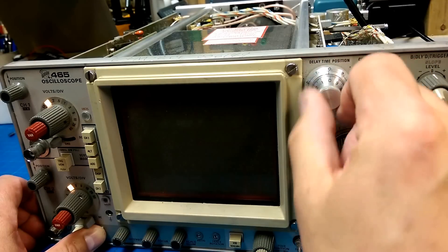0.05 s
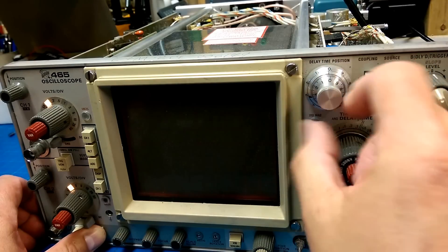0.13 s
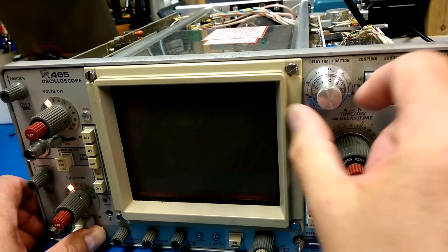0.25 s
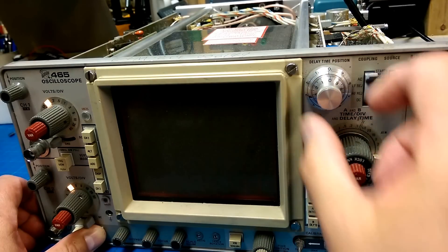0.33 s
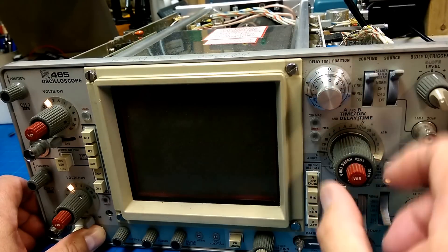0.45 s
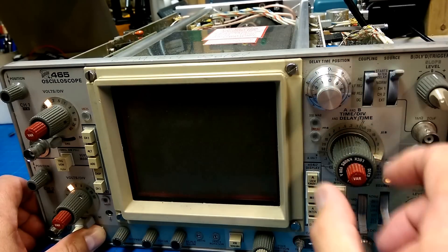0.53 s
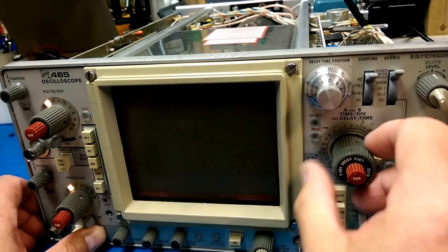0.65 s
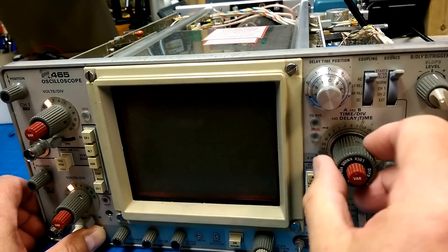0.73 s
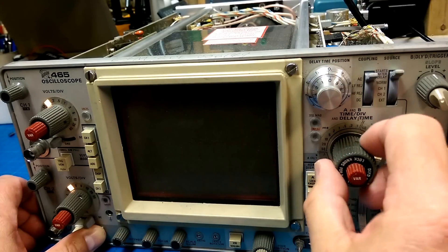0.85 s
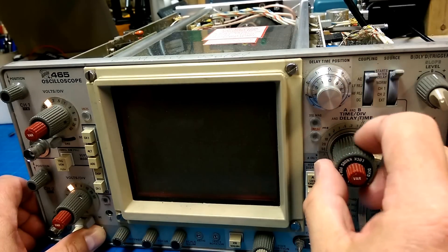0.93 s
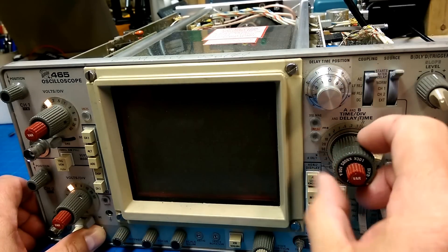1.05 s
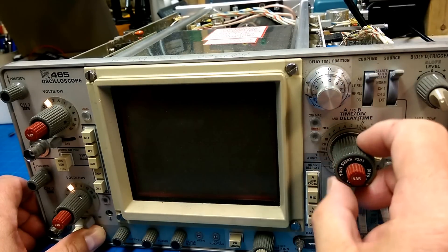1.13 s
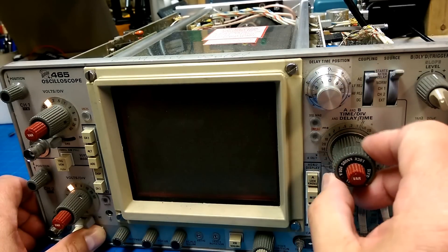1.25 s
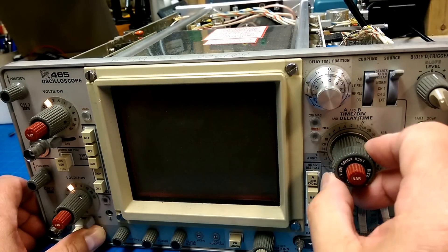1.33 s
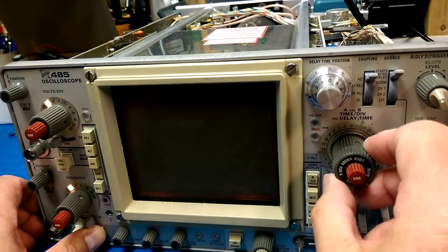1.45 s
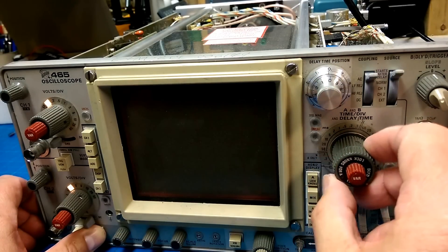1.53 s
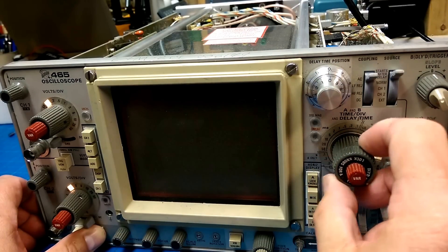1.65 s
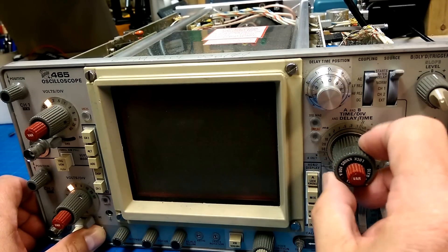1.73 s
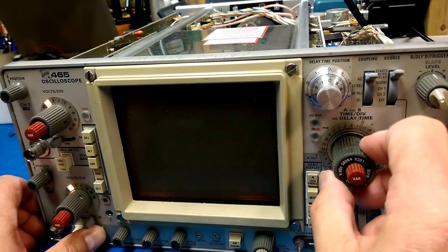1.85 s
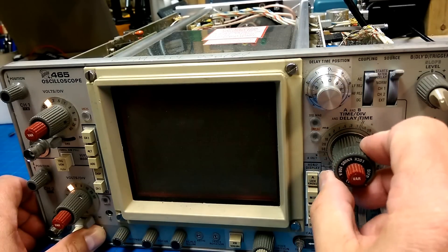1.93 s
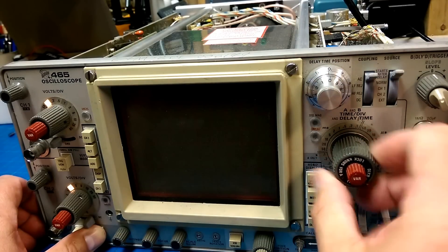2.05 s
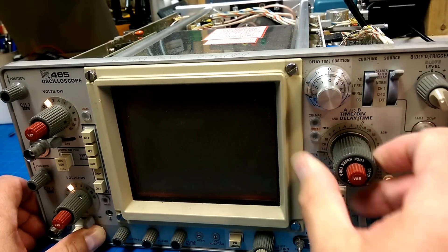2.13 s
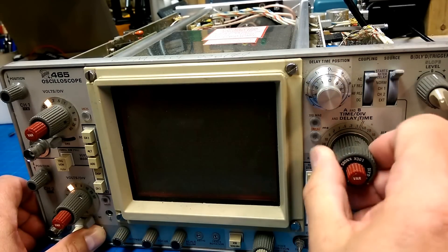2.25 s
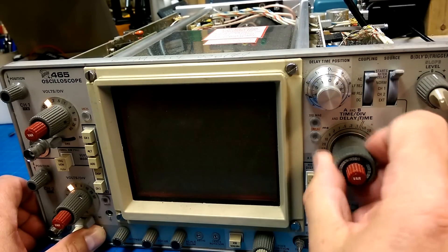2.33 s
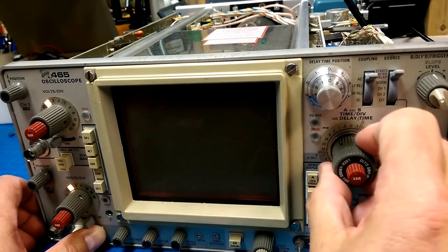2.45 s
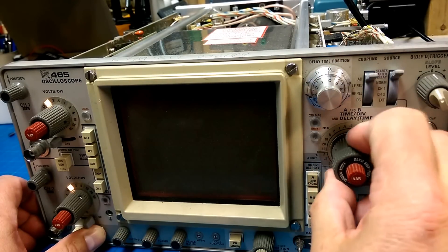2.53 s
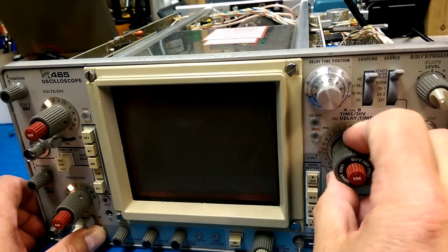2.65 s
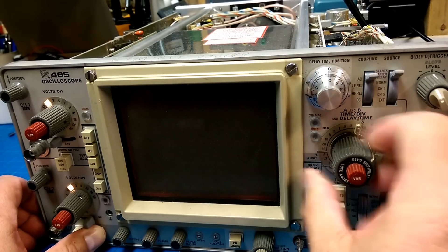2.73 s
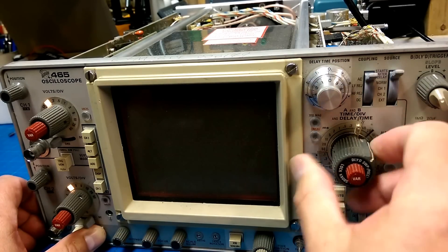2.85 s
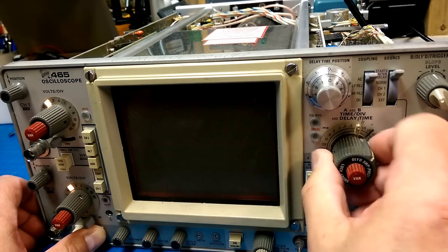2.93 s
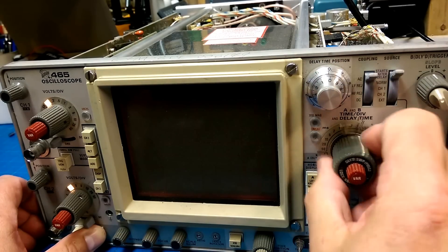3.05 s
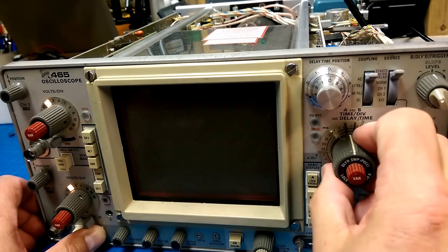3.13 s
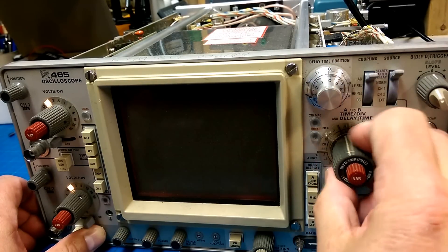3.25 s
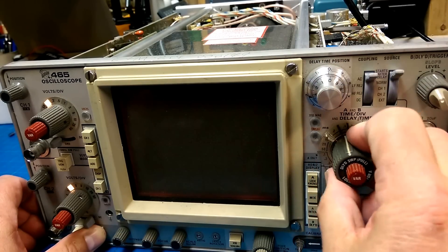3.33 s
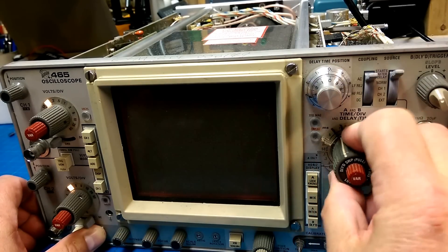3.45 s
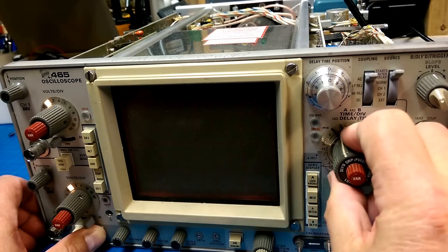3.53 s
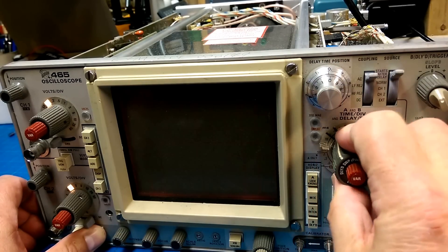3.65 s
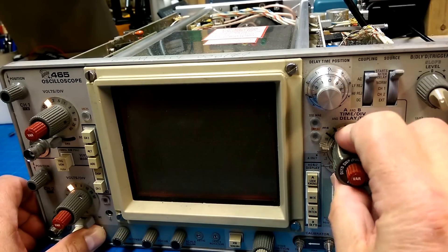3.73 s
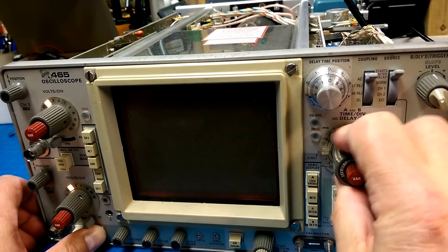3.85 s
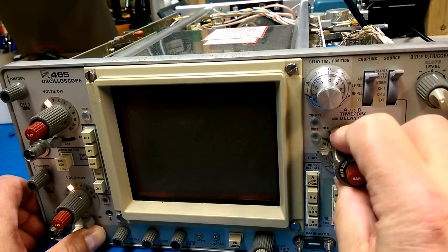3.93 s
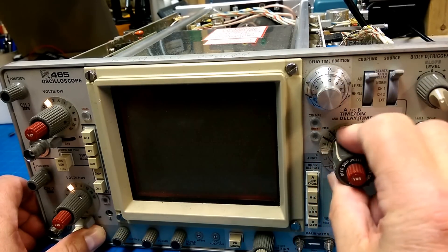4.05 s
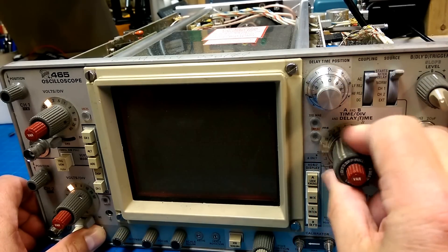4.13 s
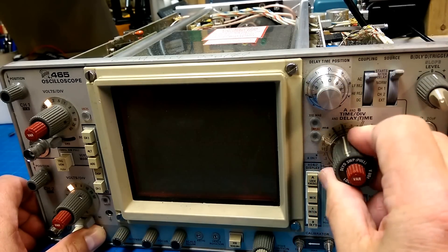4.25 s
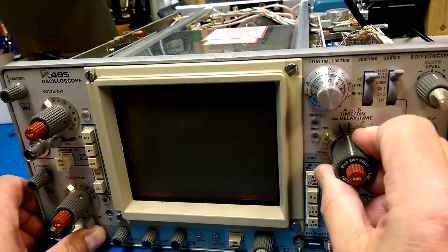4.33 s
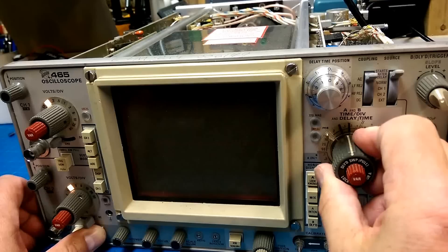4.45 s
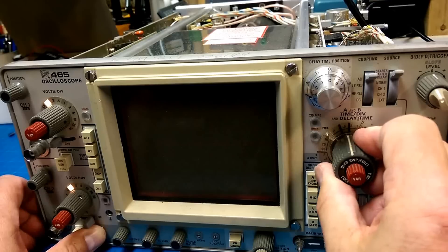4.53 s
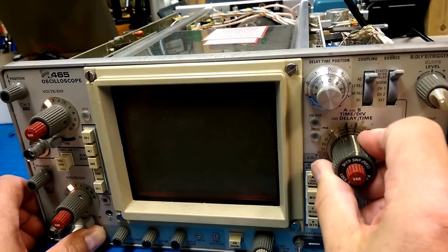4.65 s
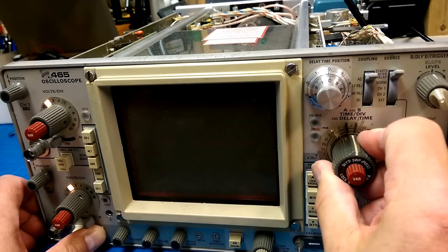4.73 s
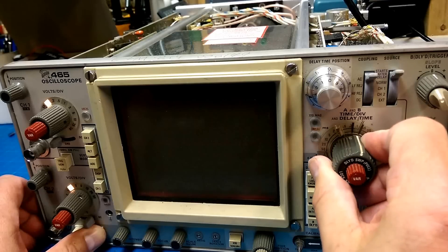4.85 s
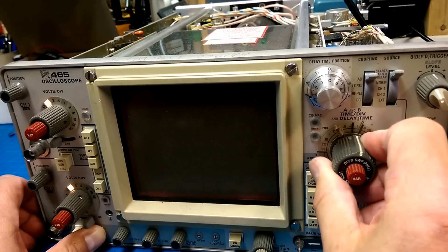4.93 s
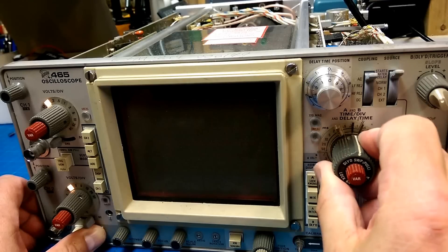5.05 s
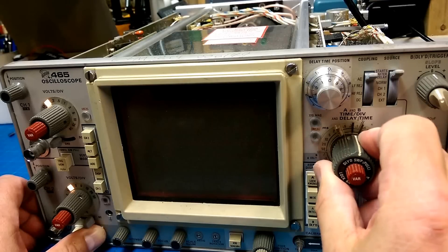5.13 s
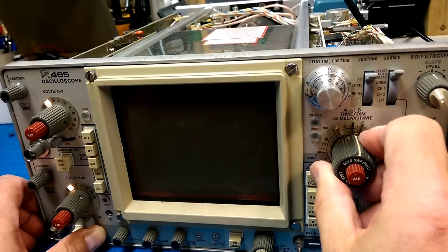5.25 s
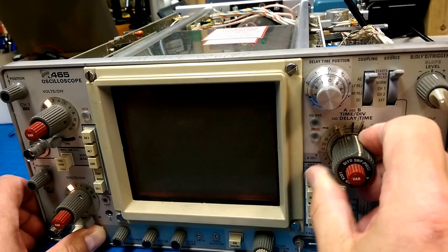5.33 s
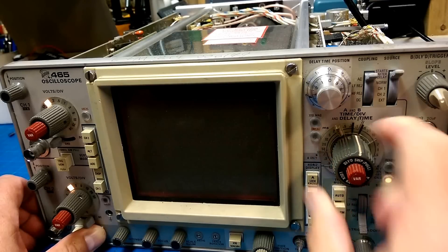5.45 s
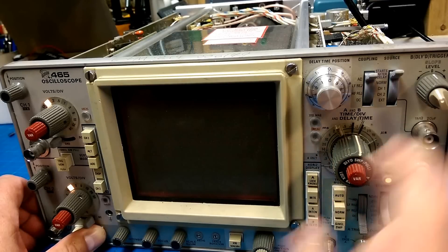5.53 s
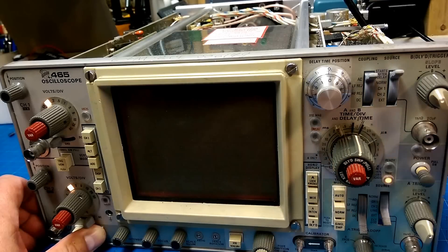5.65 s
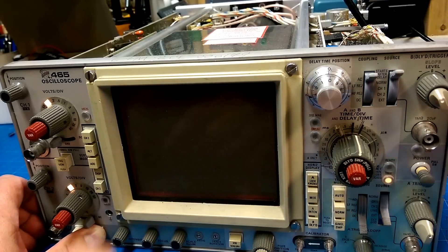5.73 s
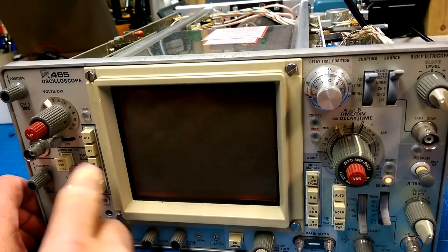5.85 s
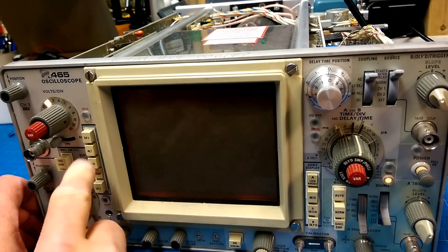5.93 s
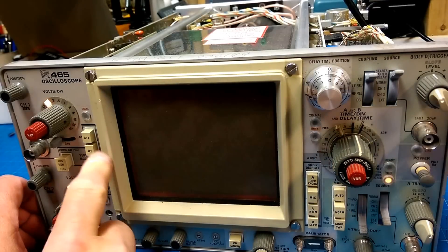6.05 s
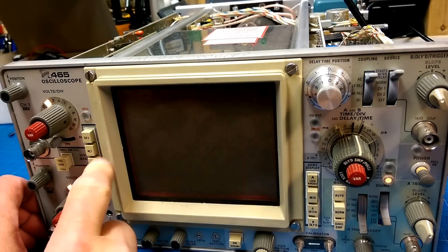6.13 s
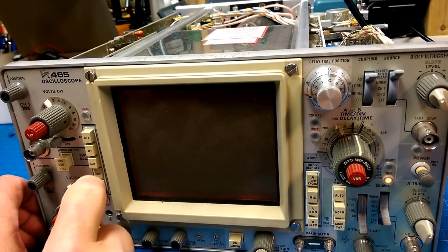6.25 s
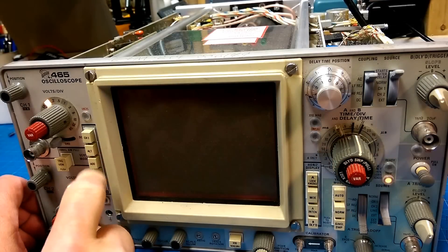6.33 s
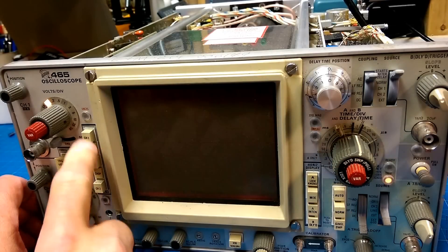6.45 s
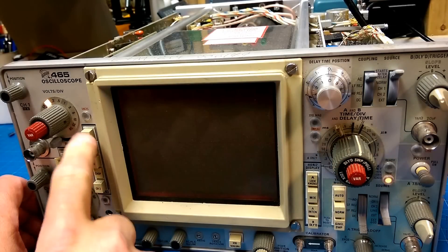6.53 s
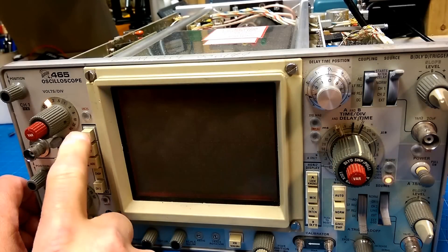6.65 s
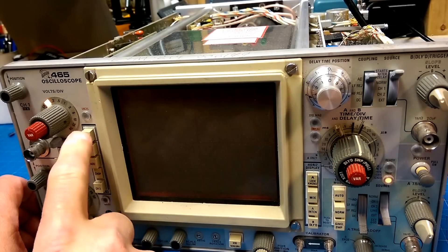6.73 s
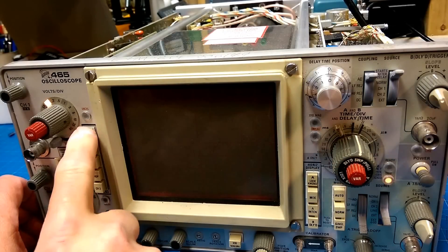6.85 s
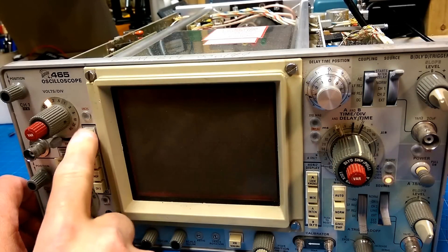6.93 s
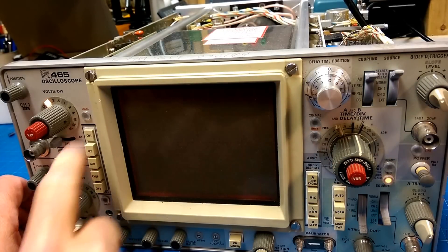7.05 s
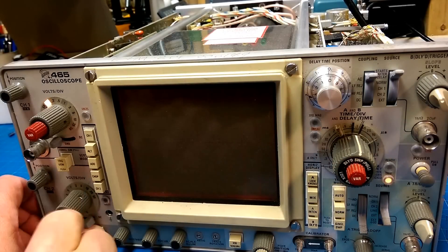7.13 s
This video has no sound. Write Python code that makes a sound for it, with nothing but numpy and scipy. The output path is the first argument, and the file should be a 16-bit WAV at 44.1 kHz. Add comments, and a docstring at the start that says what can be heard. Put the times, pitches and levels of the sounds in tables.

```python
"""Mains hum, room rumble and hiss swell and sink throughout. Fingers first brush and grip the knobs of a
bench instrument, with dull knocks. From 2.4 s its rotary switch clicks through the detents, in quick runs,
then single steps; the springs ring on. At 5.7 s the hand rustles away; at 6.9 s it presses and releases a
push button. Each contact is a chatter of tiny blows that snaps and shoves the sheet-metal case. The left
microphone faces the panel; the right is shadowed and hears mostly case and bench."""
import sys
import numpy as np
from scipy import signal
from scipy.fft import rfft, irfft, next_fast_len
from scipy.io import wavfile
from scipy.ndimage import uniform_filter1d, map_coordinates

SR = 44100
rng = np.random.default_rng(int(sys.argv[2]) if len(sys.argv) > 2 else 0)


def persist_wave(psi):
    """Save psi, clipped to +-1, as 16-bit WAV."""
    counts = np.round(np.clip(psi, -1, 1) * 32767).astype(np.int16)
    wavfile.write(sys.argv[1], SR, np.atleast_2d(counts).T)


N = 317520
SPAN = 1 << 13  # samples per event

# Background swell and hum level. Each row: time in seconds, gain in dB.
SWELL_DB = [(0, 1), (.2, 5.5), (.7, -5), (.8, 3.5), (1, 1), (2, .5), (2.3, 5), (2.9, 4.5), (4.6, 3),
            (5.05, 6), (5.3, -1.5), (5.6, 3.5), (6.2, -1.5), (6.5, -4), (6.65, 1.5), (6.8, 0), (7, 7),
            (7.2, 1)]
HUM_LEVEL_DB = [(0, -64.5), (.6, -68), (3, -64), (4.5, -65), (5.3, -71.5), (6.6, -74), (7.2, -69)]
# Hum partials. Each row: harmonic number, relative level in dB.
HUM_HARMONICS = [(1, 0), (2, -14), (4, -16), (6, -17), (7, -17), (8, -19)]
# Noise and snap spectra. Each row: frequency in Hz, relative density in dB.
RUMBLE_DB = [(8.8, -30), (15, -4), (22, -2.5), (92, -9), (124, -8.5), (160, -17), (210, -38), (350, -120)]
DRONE_DB = [(82, -42.5), (140, -12), (259, -5), (485, -12.5), (521, -15), (567, -10.5), (632, -15),
            (930, -15.5), (1020, -17.5), (2500, -25.5), (3250, -54.5), (5500, -120)]
HISS_DB = [(880, -35), (1500, -9), (1800, -8), (2850, -3), (3850, -5), (13800, -12), (15700, -11),
           (16500, -25)]
SNAP_DB = [(350, -29.5), (600, -10), (872, -8.5), (1420, -4.5), (1580, -8), (2270, -2.5), (3350, -5),
           (4670, -2), (6000, -5.5), (8360, -6.5), (14400, -10.5), (15800, -20.5), (16500, -40.5)]
RUSTLE_DB = [(1500, -25), (2500, -1.5), (5000, -8), (8600, 0), (11000, -3), (16000, -10)]
# Stereo likeness. Each row: frequency in Hz, left-right correlation.
DRONE_CORRELATION = [(60, 0.3), (180, 1), (550, 0.13), (1650, 0.39), (4970, -0.04), (15000, 0.19)]
RUMBLE_CORRELATION = [(30, 0.68), (150, 0.43)]
# Direct path and bench scatter at the right microphone. Each row: frequency in Hz, gain in dB.
SHADOW_DB = [(200, -1), (700, -6.5), (2400, -13), (4400, -35.5), (8000, -32), (15000, -44)]
SCATTER_DB = [(200, 6.5), (1300, 2), (4400, -10.5), (15000, -17)]
# Bench and room decay. Each row: frequency in Hz, T60 in seconds.
BENCH_T60_S = [(300, 0.3), (1000, 0.097), (3000, 0.09), (8000, 0.08), (15000, 0.091)]
ROOM_T60_S = [(200, 0.63), (1000, 0.32), (4000, 0.26), (15000, 0.13)]
# Case and contact spring modes. Each row: frequency in Hz, relative level in dB, T60 in seconds.
CASE_MODES = [(80, -10, 0.11), (157, -7.5, 0.14), (203, -12.5, 0.2), (252.4, -3.5, 0.12), (331, -6, 0.12),
              (411.1, -0.5, 0.15), (440.6, -3.5, 0.2), (500.7, -9.5, 0.16), (617, -4, 0.1), (735, 6, 0.08),
              (843, 7, 0.09), (936, 4.5, 0.14), (1162, -6.5, 0.18), (1493, 5.5, 0.038)]
SPRING_MODES = [(3900, -64.5, .3), (5850, -66.5, .25), (7650, -64.5, .3)]
# Resonances of switch and button parts. Each row: centre in Hz, width in Hz, mean lift in dB.
SWITCH_PARTS = [(2300, 350, 4.5), (3056, 250, 5.5), (4547, 400, 4), (5230, 250, 5), (6860, 140, 8.5),
                (7554, 160, 4), (8310, 460, 6), (9560, 1500, 5), (10740, 630, 3.5)]
BUTTON_PARTS = [(805, 290, 11), (1660, 180, 11), (2475, 280, 14), (4600, 290, 3), (9500, 1240, 14.5),
                (11200, 510, 9)]
# Dull knocks. Each row: start in seconds, strength in dB, pitch in Hz, T60 in seconds.
KNOCKS = [(.054, -42.5, 249, 0.14), (.756, -31, 334, 0.059), (1.084, -27.5, 156, 0.058),
          (1.393, -56, 260, 0.21), (1.523, -47, 258, 0.12), (1.762, -43, 220, .088),
          (1.809, -46.5, 272, 0.12), (4.086, -41.5, 256, 0.097), (5.833, -47, 327, .1),
          (6.643, -52.5, 356, 0.3), (7.087, -51, 211, 0.32)]
# Fingers meeting and leaving the knobs; button press and release. Each row: time in seconds,
# snap in dB, case shove in dB, colour peak in Hz, tilt in dB per octave.
KNOB_TOUCHES = [(0.0247, -28, -67, 2580, -2.5), (.0692, -29, -71, 3900, -6), (0.0732, -28.5, -73, 2130, 7),
                (0.1191, -6, -48, 1150, -1.5), (0.1693, -16.5, -48.5, 2650, -4),
                (0.2595, -23.5, -59, 2720, -3), (0.745, -29.5, -55, 2270, -7), (0.76, -36, -48, 2300, -5),
                (0.8156, -32, -52, 2140, -7), (1.0849, -17, -42, 1870, -2), (1.096, -17, -62, 2420, -3),
                (1.301, -35.5, -61, 4440, -9), (1.5148, -30.5, -59.5, 3000, -10.5),
                (1.821, -37.5, -63, 2280, -9), (1.8688, -31.5, -56.5, 4460, -5.5),
                (2.1186, -21, -44.5, 3240, -7), (2.1468, -28, -48, 2660, -2.5),
                (2.2171, -26, -52.5, 1820, -8), (2.224, -30.5, -58, 8230, -2.5),
                (2.2806, -28.5, -54.5, 4340, -4), (2.3079, -20.5, -53.5, 4120, -2),
                (2.3196, -28, -53.5, 3610, -5), (2.7647, -16, -45.5, 2530, -3),
                (2.9813, -26, -66.5, 2880, -10), (3.0212, -37.5, -54, 2150, -10.5),
                (4.0689, -10.5, -44, 3050, -3.5), (5.0376, -27.5, -52, 2380, -4.5),
                (5.3784, -37.5, -69, 3270, -5), (5.3969, -32, -57.5, 1990, -10),
                (5.453, -33.5, -68, 3200, -3), (5.5127, -19, -46.5, 3800, -4), (6.5987, -28, -58, 2500, -9)]
BUTTON_HITS = [(6.8767, -6.5, -45, 4280, 0.5), (6.8819, 6, -34, 2870, -1), (6.8857, 2, -41, 4480, 1),
               (7.0449, -23, -58, 4750, -6), (7.0486, -19, -58, 2510, -3), (7.0642, -24, -59.5, 1700, -4)]
# Switch detents. Each row: time in seconds, snap in dB, colour peak in Hz, chatter length in seconds.
DETENT_HITS = [(2.4079, 8.5, 2320, 0.0083), (2.424, 8.5, 4600, 0.0077), (2.4379, 12, 4640, .0063),
               (2.4576, 9, 7450, 0.0049), (2.5605, 8.5, 3910, .0038), (2.602, 9.5, 8860, 0.0054),
               (2.6332, 9, 8340, 0.0052), (3.1207, 11, 9600, 0.0043), (3.1372, 10.5, 4700, 0.0036),
               (3.162, 10.5, 4930, 0.0037), (3.184, 8.5, 4420, 0.0052), (3.336, 7.5, 9840, 0.004),
               (3.5239, 9, 9200, 0.0037), (3.7187, 9.5, 5140, .004), (3.9364, 9, 4430, .0042),
               (4.2305, 9, 8070, 0.0047), (4.2553, 4, 4930, 0.0047), (4.417, 6, 5540, 0.0055),
               (4.6798, 8, 7970, 0.0017), (4.9155, 6, 3920, 0.005)]


def amp(db):
    return 10 ** (np.asarray(db) / 20)


def unit_rms(x):
    return x / np.sqrt(np.mean(x ** 2) + 1e-20)


def over_hz(points, hz):
    """Interpolate on a log frequency axis."""
    knots_hz, values = np.transpose(points)
    return np.interp(np.log(hz + 1), np.log(knots_hz + 1), values)


def over_time(points):
    """Interpolate to one value per sample."""
    return np.interp(np.arange(N) / SR, *np.transpose(points))


def wobble(rate_hz):
    """Smooth random curve."""
    knots = rng.standard_normal(int(N * rate_hz / SR) + 4)
    return map_coordinates(knots, [np.arange(N) * rate_hz / SR])


def filtered(x, response):
    """Apply a frequency response."""
    size = next_fast_len(N + SR // 2)
    return irfft(rfft(x, size) * response(np.fft.rfftfreq(size, 1 / SR)), size)[..., :N]


def min_phase(gain_db):
    """Causal response with these gains."""
    cepstrum = irfft(np.log(amp(np.maximum(gain_db, -80))))
    half = cepstrum.shape[-1] // 2
    cepstrum[..., 1:half] *= 2
    cepstrum[..., half + 1:] = 0
    return np.exp(rfft(cepstrum))


def whiten(spectrum):
    """Level out broad chance colour."""
    power = uniform_filter1d(np.abs(spectrum) ** 2, size=60, axis=-1)
    return spectrum * min_phase(-10 * np.log10(power + 1e-6))


def tail(t60_s, size):
    """Unit-energy stereo noise; each frequency decays at its own rate."""
    hz, t, bins = signal.stft(rng.standard_normal((2, size)), SR, nperseg=128)
    decay = amp(-60 * t / over_hz(t60_s, hz)[:, None])
    x = signal.istft(bins * decay, SR, nperseg=128)[1][:, :size]
    return x / np.linalg.norm(x[0])


def noise(spectrum_db, correlation, patchy_db):
    """Unit-rms stereo noise with patches of random gain."""
    bins = signal.stft(rng.standard_normal((2, N)), nperseg=512)[2]
    patches = uniform_filter1d(rng.standard_normal(bins.shape[1:]), size=6, axis=0)
    patches = unit_rms(uniform_filter1d(patches, size=10, axis=1))
    pair = signal.istft(bins * amp(patchy_db * patches), nperseg=512)[1][:, :N]

    def response(hz):
        angle = np.arccos(np.clip(over_hz(correlation, hz), -1, 1)) / 2
        return amp(over_hz(spectrum_db, hz)) * [np.cos(angle), np.sin(angle)]

    mid, side = filtered(pair, response)
    return unit_rms(np.array([mid + side, mid - side]))


def transformer_hum(hum_hz=118.6):
    """Mains harmonics, wavering in pitch and level."""
    phase = 2 * np.pi * np.cumsum(hum_hz + .5 * wobble(3.1)) / SR
    tone = sum(amp(db + 1.2 * wobble(4.5)) * np.sin(k * phase) for k, db in HUM_HARMONICS)
    return amp(over_time(HUM_LEVEL_DB)) * tone


def room_noise():
    """Rumble, drone and hiss on one swell; the drone moves most, the rumble least."""
    swell_db = over_time(SWELL_DB)
    rumble = amp(-68.5 + 0.67 * swell_db) * noise(RUMBLE_DB, RUMBLE_CORRELATION, patchy_db=1.3)
    drone_gain = amp(-69 + 1.3 * swell_db + 0.65 * wobble(7.5))
    drone = drone_gain * noise(DRONE_DB, DRONE_CORRELATION, patchy_db=3.0)
    hiss = amp(-72.5 + 0.78 * swell_db) * noise(HISS_DB, [(1000, 0.0097)], patchy_db=2.35)
    return (rumble + drone) * amp([[1.1], [-1.1]]) + hiss


def hand_rustle(start_s=5.69, rise_s=0.045, hold_s=.05, fall_db_per_s=110):
    """The hand moves away: a faint swish, left of centre."""
    age_s = np.arange(N) / SR - start_s
    fade_db = fall_db_per_s * (age_s - rise_s - hold_s).clip(0)
    gain = np.clip(age_s / rise_s, 0, 1) * amp(-70 - fade_db)
    return gain * noise(RUSTLE_DB, [(1000, 0)], patchy_db=2) * amp([[3], [-5]])


def knocks(rise_s=0.028):
    """Short low tones with a soft start."""
    out, t = np.zeros(N + SPAN), np.arange(SPAN) / SR
    for start_s, db, hz, t60_s in KNOCKS:
        envelope = amp(db - 60 * t / t60_s) * (1 - np.exp(-t / rise_s))
        out[round(start_s * SR):][:SPAN] += envelope * np.sin(2 * np.pi * hz * t)
    return out[:N]


def springs():
    """Thin switch springs ring on after each detent, mostly on the left."""
    out, t = np.zeros(N + SPAN), np.arange(SPAN) / SR
    for start_s, snap_db, *_ in DETENT_HITS:
        ring = np.zeros(SPAN)
        for hz, db, t60_s in SPRING_MODES:
            envelope = amp(db + rng.normal(0, 3) - 60 * t / t60_s)
            ring += envelope * np.sin(2 * np.pi * hz * rng.normal(1, 0.0044) * t)
        out[round(start_s * SR):][:SPAN] += amp(snap_db) * ring * (1 - t * SR / SPAN)
    return out[:N] * amp(4 * wobble(60)) * amp([[3], [-9]])


def contacts(rows, parts, lift_db, bench_db, slip_db, spiky_db, rise_s, shove_hz, slip_s=.004):
    """A faint slip, then a chatter of tiny blows that snaps, shoves the case and scatters off the bench."""
    out, t, hz = np.zeros((2, N + SPAN)), np.arange(SPAN) / SR, np.fft.rfftfreq(SPAN, 1 / SR)
    age_s = (t - slip_s).clip(0)
    # Longer paths to the right microphone; low tones bend round the recorder.
    right_snap = min_phase(over_hz(SHADOW_DB, hz)) * np.exp(-2j * np.pi * hz * .0001)
    right_case = amp(-2.5) * np.exp(-2j * np.pi * hz * 0.00024)
    right_bench = min_phase(over_hz(SCATTER_DB, hz))
    bench_onset = 1 - np.exp(-t[:SPAN // 2] / .003)
    parts_db = np.array([db / (1 + (2 * (hz - mid_hz) / width_hz) ** 2) for mid_hz, width_hz, db in parts])
    mode_hz, mode_db, t60_s = np.transpose(CASE_MODES)[:, :, None]
    mode_envelopes = amp(mode_db - 60 * age_s / t60_s) * (1 - np.exp(-age_s / 0.006))
    modes = rfft(mode_envelopes * np.sin(2 * np.pi * mode_hz * age_s))
    shove = 1 / (1 + 1j * hz / shove_hz) ** 2  # blunt: favours low modes
    octaves = np.log2(np.clip(hz, 1500, 10000) / 4000)
    for time_s, snap_db, shove_db, peak_hz, tilt_db_per_oct, chatter_s in rows:
        chatter = (1 - np.exp(-(age_s / rise_s) ** 2)) * np.exp(-(age_s / chatter_s) ** 2)
        slip = amp(slip_db) * (t / slip_s) ** 2 * np.exp(-age_s / rise_s)
        grit = rng.standard_normal(SPAN) * amp(spiky_db * rng.standard_normal(SPAN))
        blows = whiten(rfft((chatter + slip) * grit))

        peaks_db = rng.normal(1, .5, len(parts)).clip(0) @ parts_db
        peaks_db += lift_db * np.exp(-(np.log2(hz / peak_hz + 1e-9) / 0.12) ** 2)
        broad_db = over_hz(SNAP_DB, hz) + tilt_db_per_oct * octaves
        colour = min_phase(broad_db + peaks_db * [[1], [.2]])  # scattering blurs the peaks
        colour /= np.sqrt(np.mean(np.abs(colour) ** 2, axis=1))[:, None]
        snap, blurred = amp(snap_db) * blows * colour

        mode_gains = rng.choice([-1, 1], len(modes)) * amp(rng.normal(0, 2.2, len(modes)))
        case = amp(shove_db) * shove * (mode_gains @ modes)
        scatter = whiten(rfft(bench_onset * tail(BENCH_T60_S, SPAN // 2), SPAN))
        bench = amp(bench_db) * blurred * scatter

        left = snap + case + bench[0]
        right = snap * right_snap + case * right_case + bench[1] * right_bench
        start = round((time_s - rise_s - slip_s) * SR)
        out[:, start:start + SPAN] += irfft([left, right])
    return out[:, :N]


def finger_touches(chatter_s=0.0065, linger_db_per_db=0.21):
    """Fingers on the knobs; softer touches chatter longer."""
    rows = [(*row, chatter_s * amp(-linger_db_per_db * row[1])) for row in KNOB_TOUCHES]
    return contacts(rows, SWITCH_PARTS, lift_db=9.0, bench_db=-4.5, slip_db=-31.5,
                    spiky_db=1.0, rise_s=.0013, shove_hz=455.4)


def push_button(chatter_s=0.0051):
    """Hard snaps on the press, soft ones on release."""
    rows = [(*row, chatter_s) for row in BUTTON_HITS]
    return contacts(rows, BUTTON_PARTS, lift_db=9.5, bench_db=-4.0, slip_db=-31,
                    spiky_db=3, rise_s=0.0018, shove_hz=1170)


def rotary_switch(shove_db=-36, tilt_db_per_oct=1.5):
    """Each detent snaps in and gives the case an equal shove."""
    rows = [(s, db, shove_db, hz, tilt_db_per_oct, chatter_s) for s, db, hz, chatter_s in DETENT_HITS]
    return contacts(rows, SWITCH_PARTS, lift_db=4.5, bench_db=-4.5, slip_db=-26.5,
                    spiky_db=1.5, rise_s=.0016, shove_hz=1190)


def scene():
    """Clicks and their faint room reverberation over the quieter layers."""
    clicks = rotary_switch() + finger_touches() + push_button()
    delayed = np.pad(clicks[:1], ((0, 0), (400, 0)))
    reverb = amp(-27.5) * signal.fftconvolve(delayed, tail(ROOM_T60_S, SR // 2), axes=1)[:, :N]
    return clicks + reverb + springs() + knocks() + transformer_hum() + room_noise() + hand_rustle()


def record(dry, top_hz=16300):
    """Steep band limit of the recorder."""
    return filtered(dry, lambda hz: 1 / (1 + (hz / top_hz) ** 150))


dry = scene()
out = record(dry)
persist_wave(out)
```